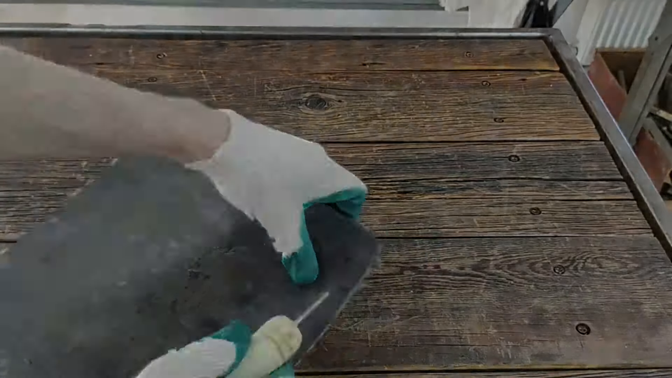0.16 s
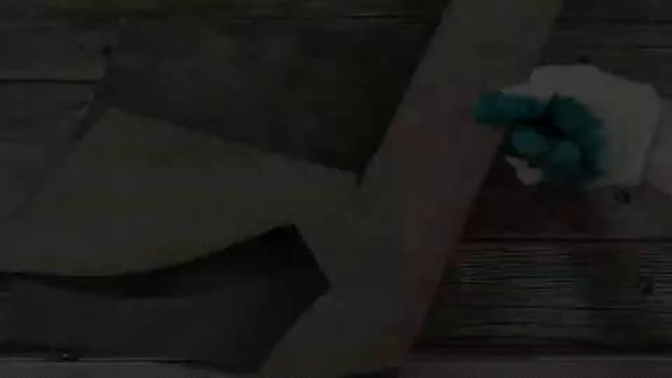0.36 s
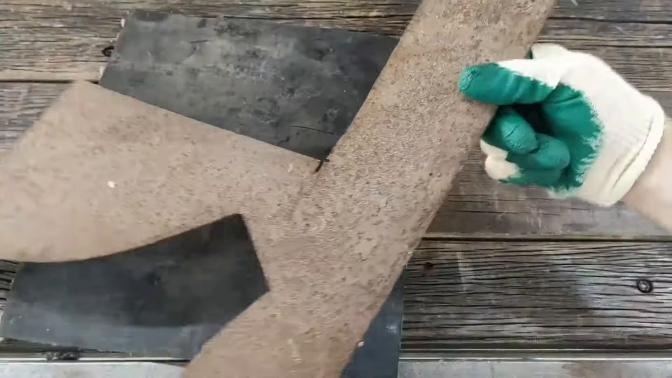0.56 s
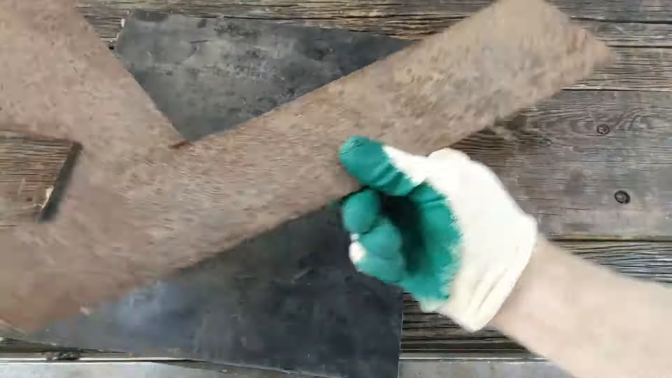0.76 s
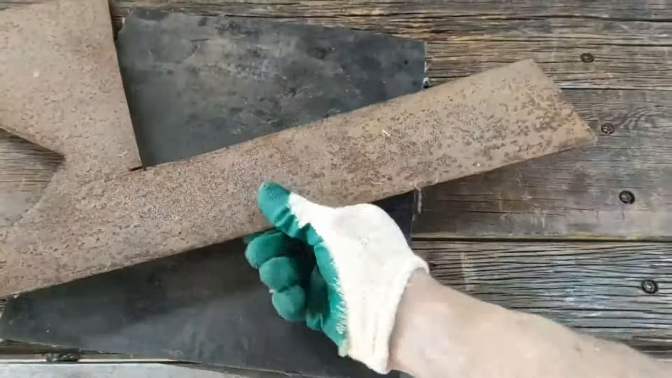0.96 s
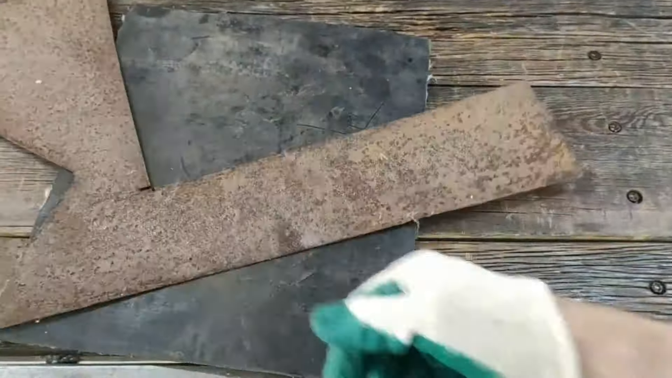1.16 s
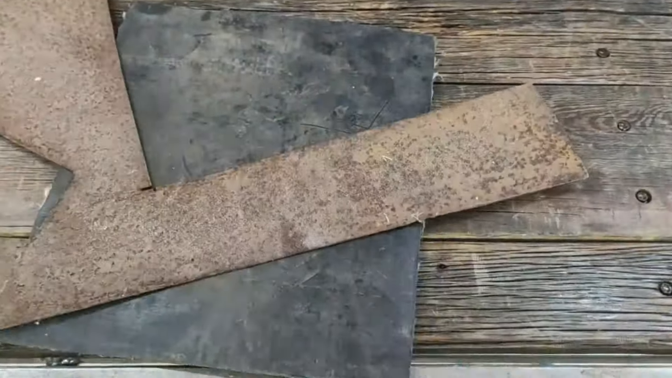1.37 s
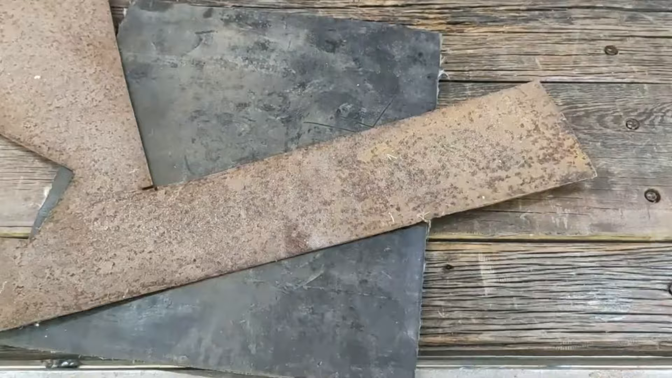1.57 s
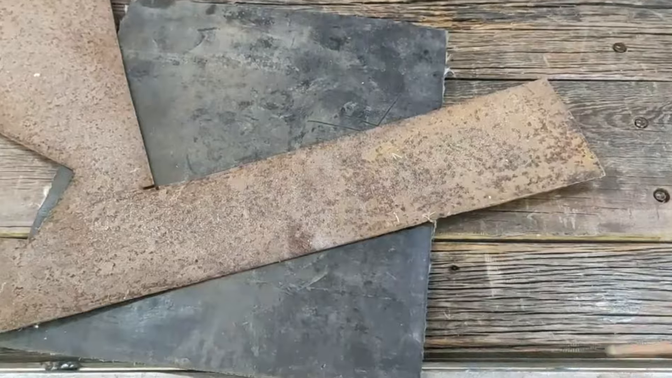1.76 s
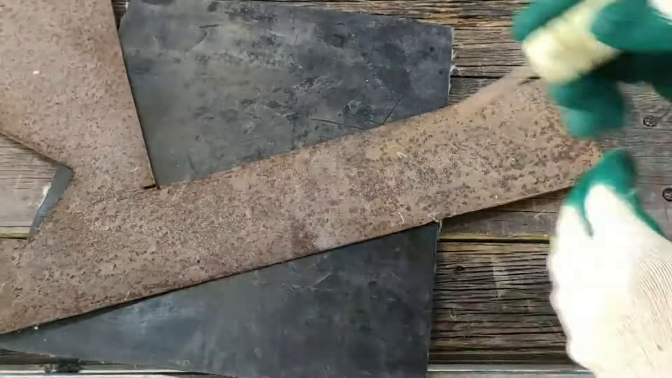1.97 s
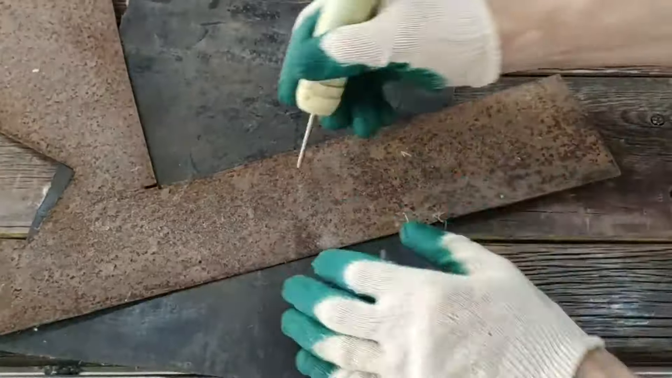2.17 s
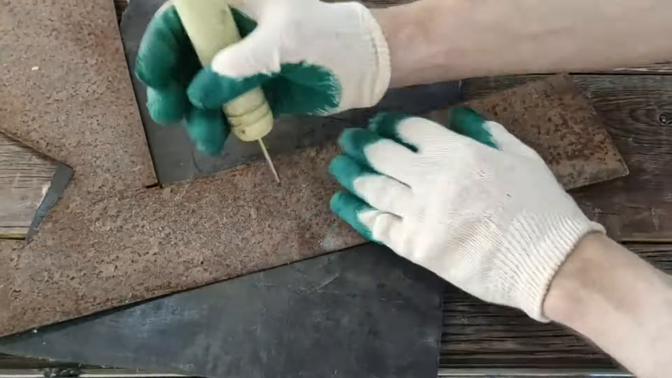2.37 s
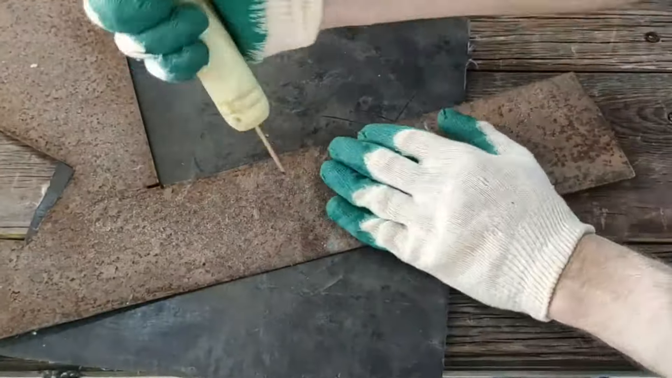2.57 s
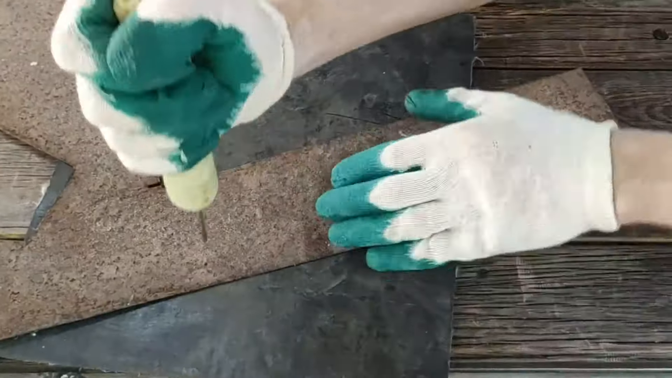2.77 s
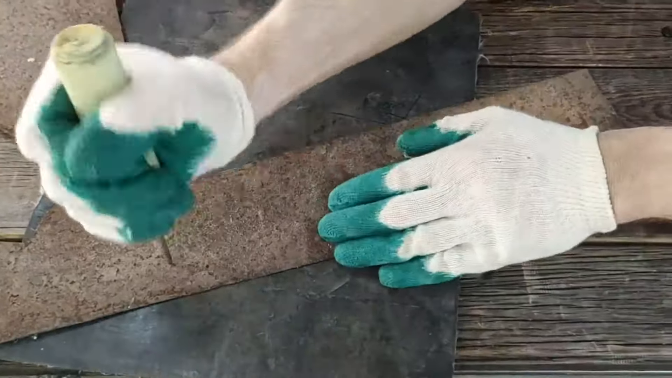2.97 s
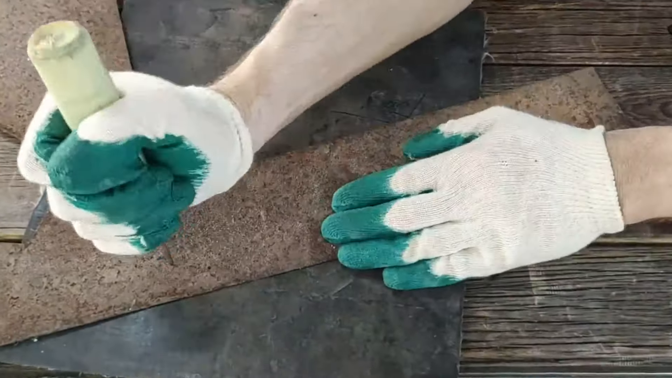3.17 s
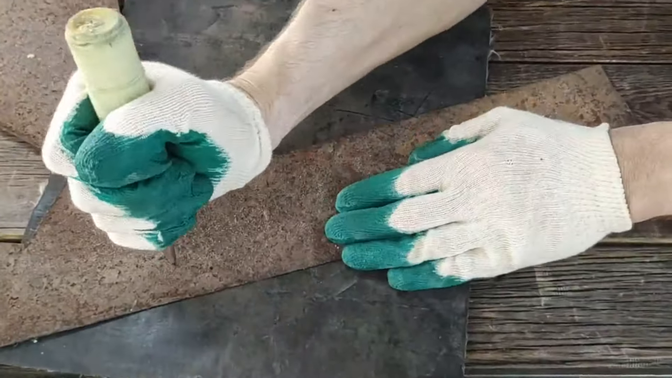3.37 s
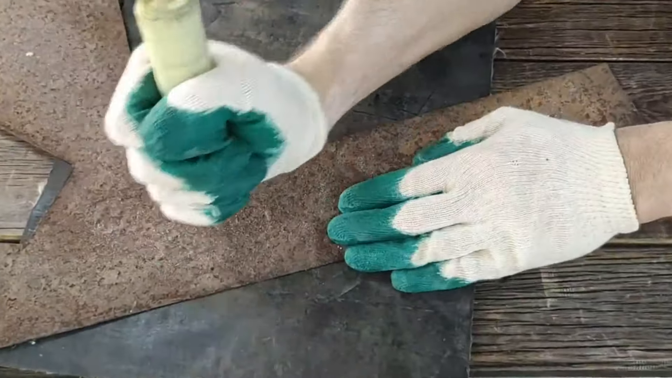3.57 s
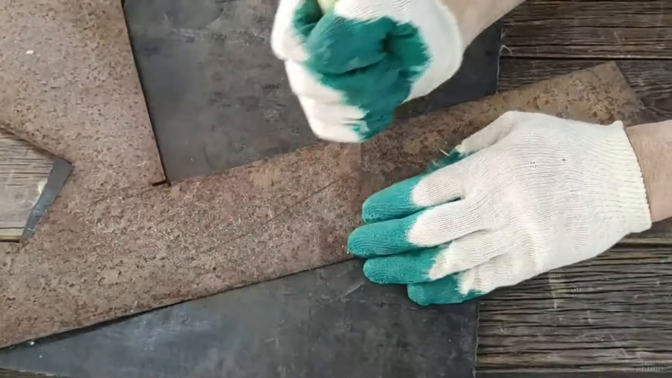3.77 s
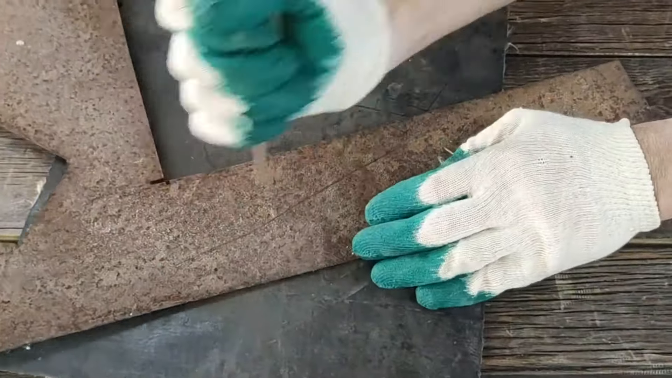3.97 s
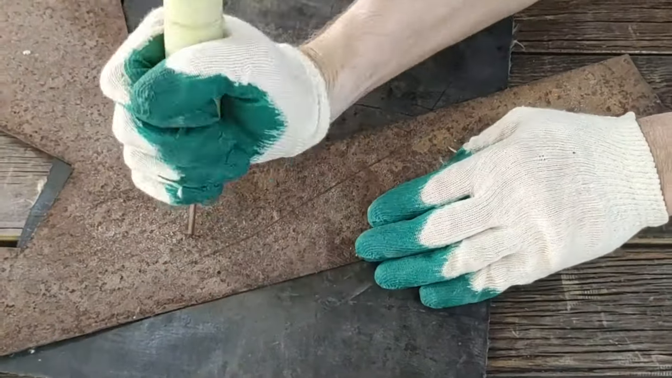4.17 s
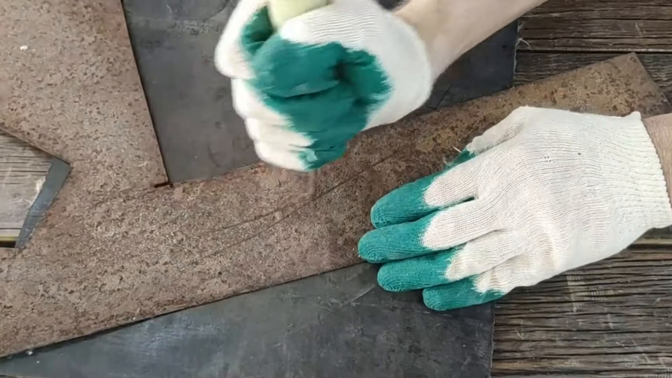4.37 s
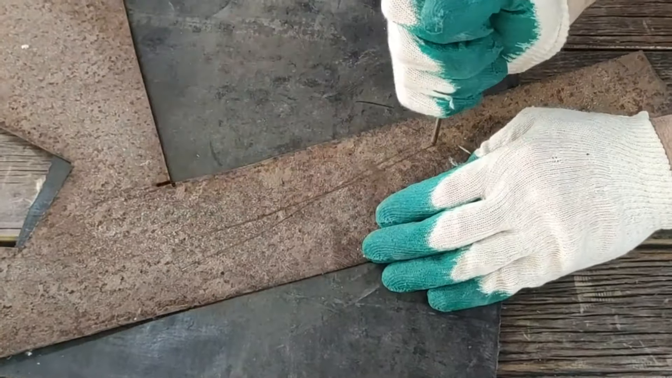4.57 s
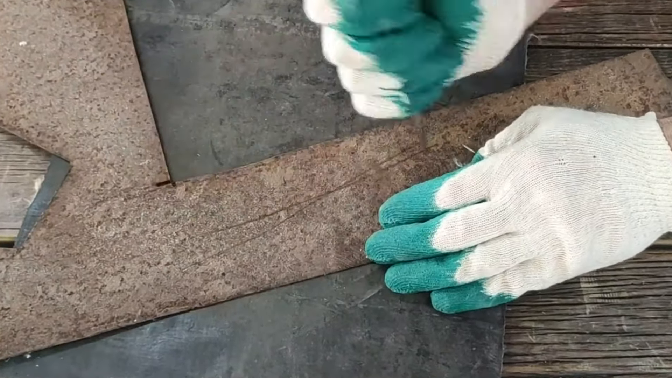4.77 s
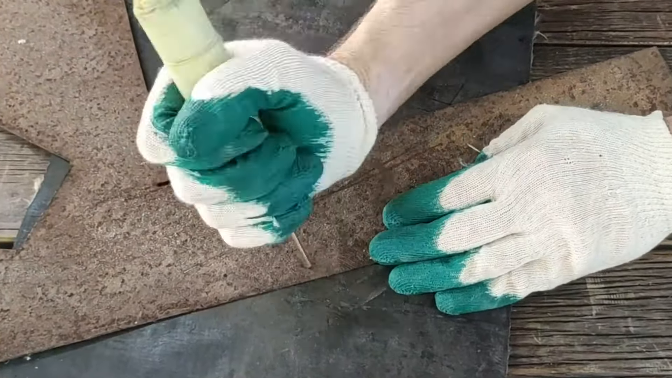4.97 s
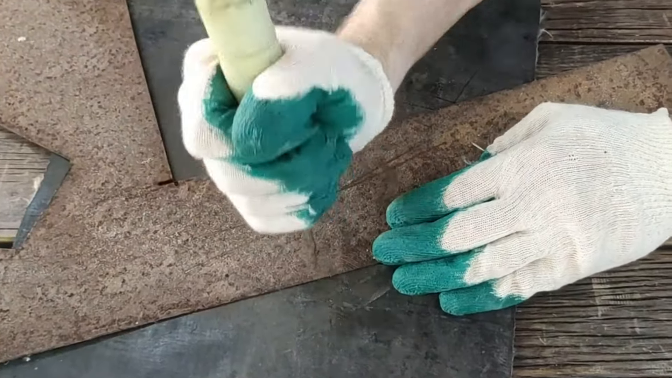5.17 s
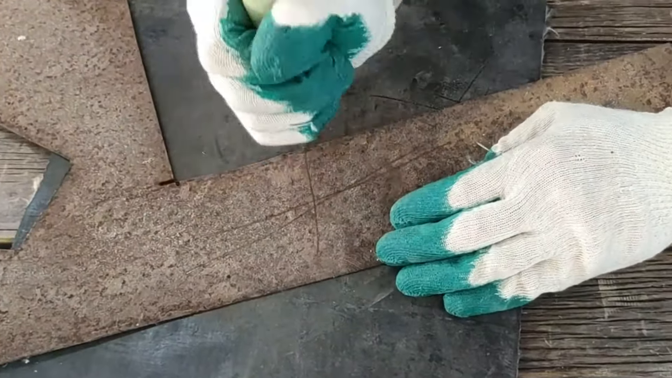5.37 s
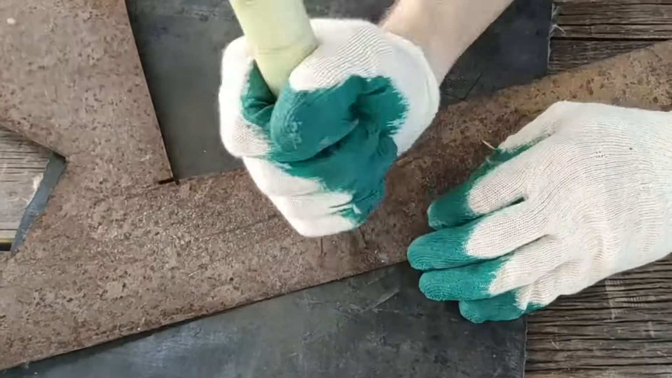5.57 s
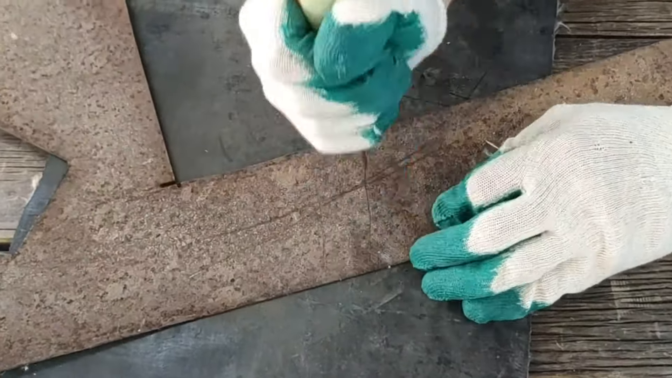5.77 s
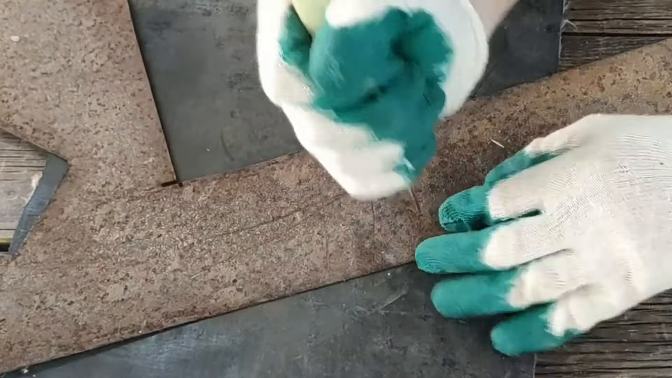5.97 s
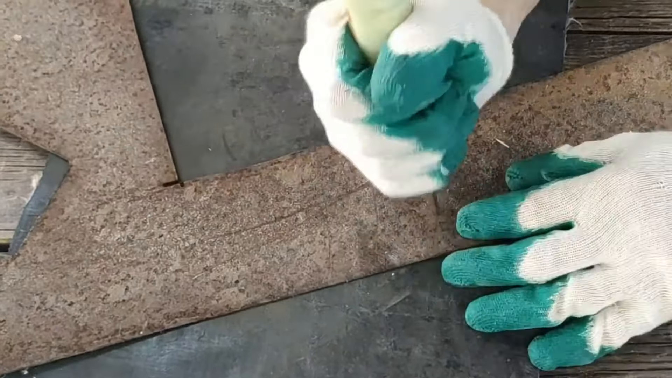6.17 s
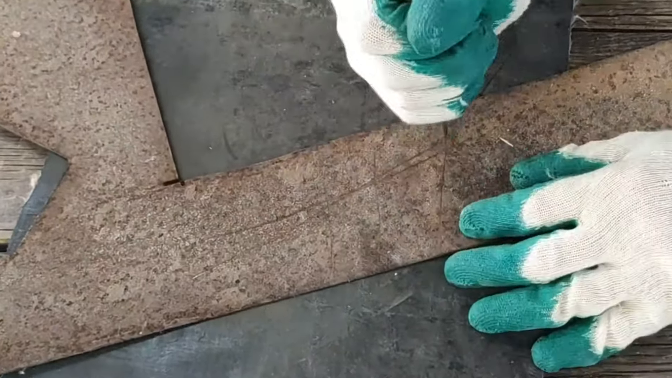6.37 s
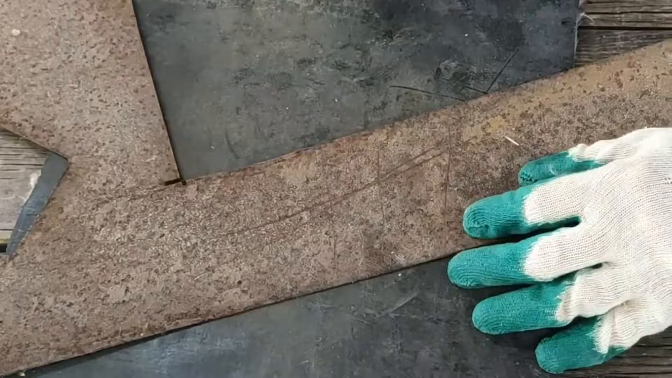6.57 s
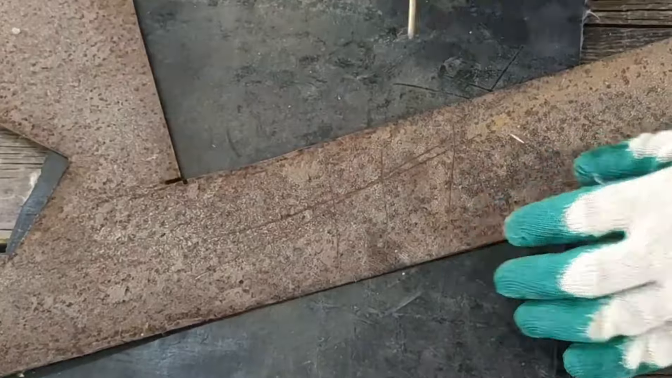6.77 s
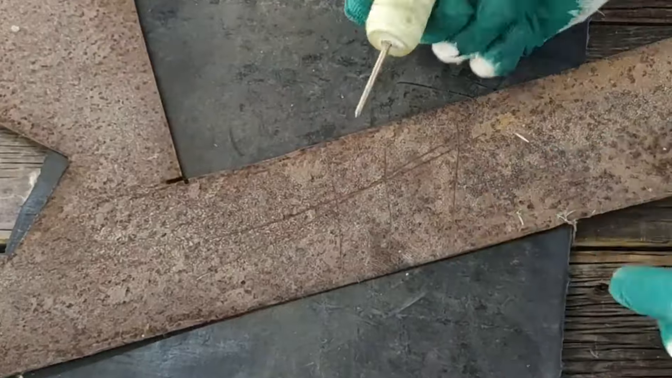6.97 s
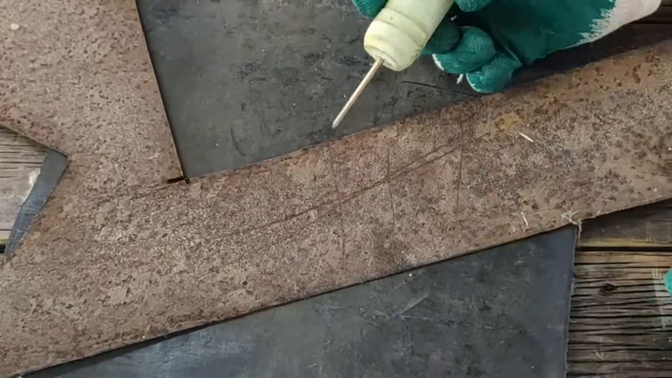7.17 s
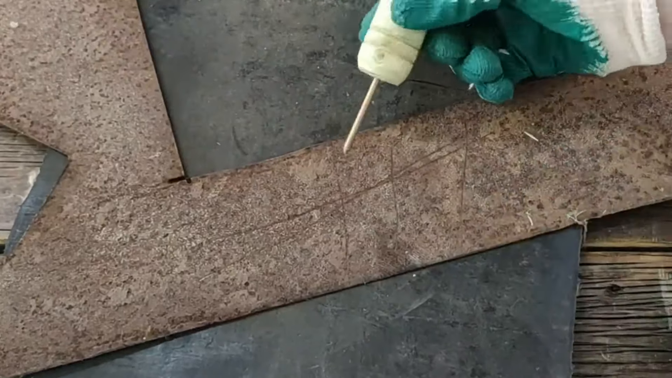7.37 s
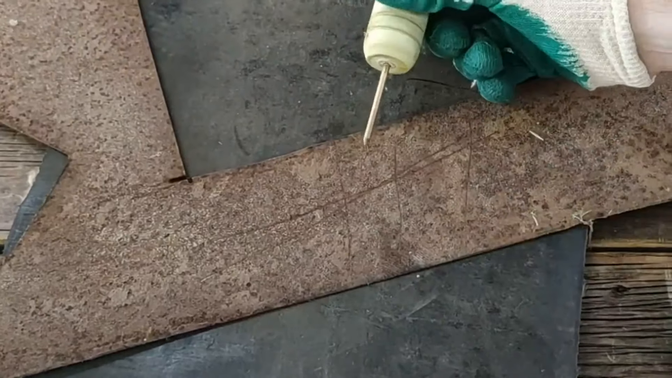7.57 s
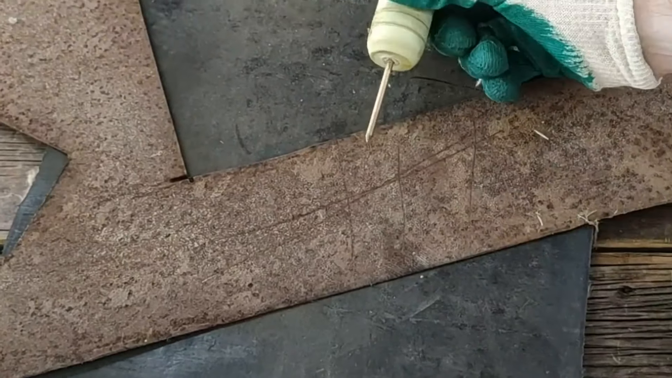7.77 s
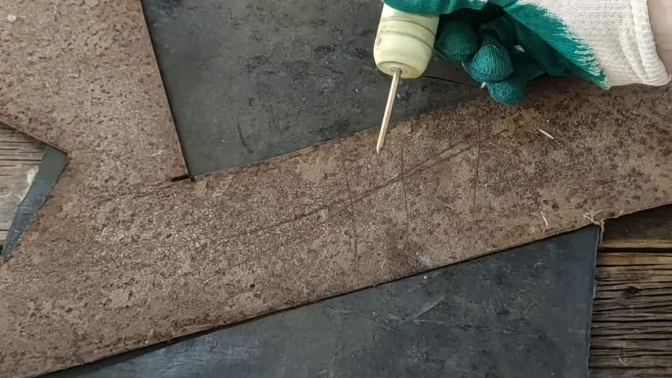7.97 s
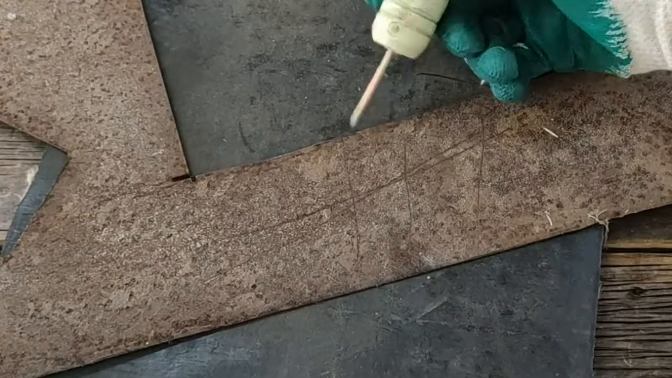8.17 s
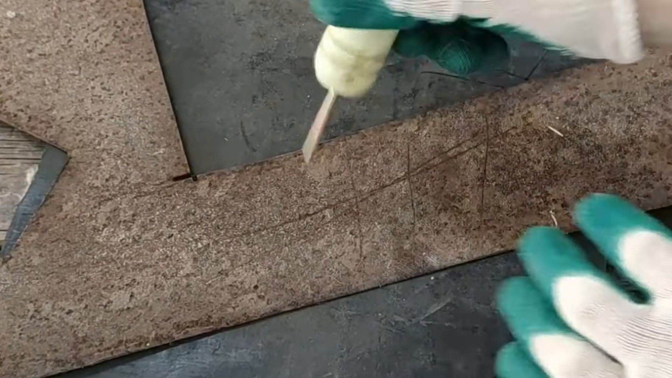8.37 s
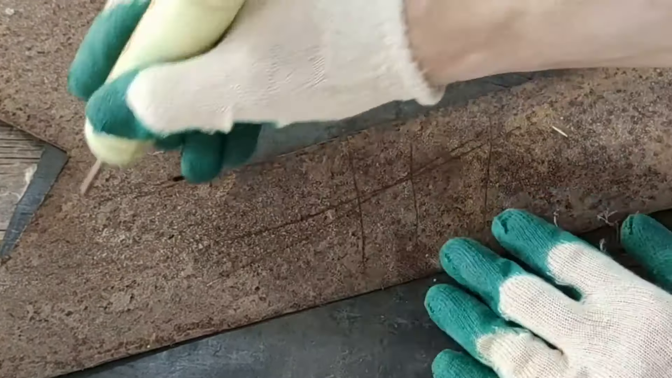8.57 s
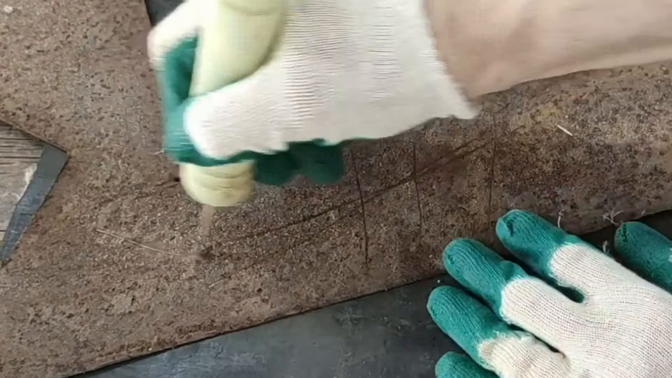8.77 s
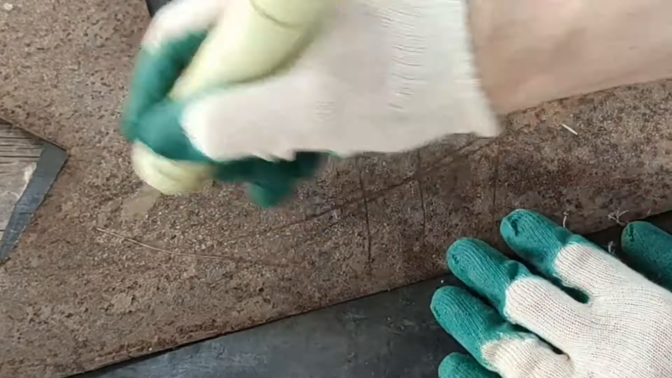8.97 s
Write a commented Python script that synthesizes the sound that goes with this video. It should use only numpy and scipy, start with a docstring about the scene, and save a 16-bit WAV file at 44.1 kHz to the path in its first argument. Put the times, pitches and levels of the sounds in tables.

```python
"""In a small workshop, a rusty steel offcut is laid on a steel plate on a wooden table; gloved hands slide over it.
A hard-tipped scriber is set down with a tick and dragged through the rust in short strokes.
Grit breaking under the tip drives the dense modes of the sheet; cloth and palm are swelling filtered noise.
Each contact is a burst of rattle with a ping; the room adds a short tail, over a low rumble and faint hiss."""
import sys
import numpy as np
from scipy import signal
from scipy.fft import rfft, irfft, next_fast_len
from scipy.io import wavfile

SR = 44100
rng = np.random.default_rng(int(sys.argv[2]) if len(sys.argv) > 2 else 0)


def materialize(psi):
    """Save the field psi as 16-bit PCM at rate SR to the path in sys.argv[1].

    A 1-D psi becomes a single channel; in a 2-D psi each row is a channel.
    """
    bounded = np.clip(np.atleast_2d(psi).T, -1, 1)
    quanta = np.round(bounded * 32767).astype(np.int16)
    wavfile.write(sys.argv[1], SR, quanta)


N = 397782

# colour of rust grains breaking and of contact rattle: pitch_hz [Hz], level_db [dB per Hz, relative]
GRIT_COLOUR = [(120, -41), (200, -11), (310, -12), (407, -6), (597, -8.5), (716, -3.5), (1030, -9),
               (1380, -2), (1630, -8.5), (2060, 0), (3140, -4), (6050, -3.5), (11200, 0), (13700, -6.5),
               (15600, -7.5)]
# modes of the offcut: pitch_hz [Hz], level_db [dB, relative], t60_s [s, ringing freely]
SHEET_MODES = [(484, -8, .25), (637, -7, .7), (760, -8, .25), (965, -9, .2), (1106, -4, .2),
               (1463, -8, .12), (1593, -10, 1.2), (1890, -9, .1), (2075, -8, .1), (2304, -16, .25),
               (2525, -9, .12), (3192, -12, .2), (3644, -6, .2), (3817, -10, .2), (4400, -6, .25)]


def amp(db):
    """Decibels to gain."""
    return 10 ** (np.asarray(db) / 20)


def rms_one(x):
    """Scale to unit rms."""
    return x / np.sqrt(np.mean(x ** 2) + 1e-20)


def at_hz(points, hz):
    """Read a table on a log-frequency axis."""
    pitch_hz, values = np.array(points)[:, 0], np.array(points)[:, 1]
    return np.interp(np.log(hz + 1), np.log(pitch_hz), values)


def colour(x, spectrum):
    """Shape white input by a spectrum, keeping its power."""
    size = next_fast_len(x.shape[-1])
    gain = amp(at_hz(spectrum, np.arange(size // 2 + 1) * SR / size))
    return irfft(rfft(x, size) * rms_one(gain), size)[..., :x.shape[-1]]


def pair(size):
    """Left and right noise, alike in the bass and unlike in the treble."""
    # stereo likeness: pitch_hz [Hz], left-right correlation [-1 to 1]
    likeness = [(30, .93), (60, 0.57), (150, 1), (380, 0.85), (950, 0.5), (2380, -0.28), (5980, -0.2),
                (15000, 0.21)]
    mid, side = rfft(rng.standard_normal((2, size)))
    alike = np.clip(at_hz(likeness, np.arange(size // 2 + 1) * SR / size), -.95, .95)
    spectra = np.sqrt(1 + alike) * mid + np.sqrt(1 - alike) * side * [[1], [-1]]
    return irfft(spectra, size) / np.sqrt(2)


def coloured_pair(spectrum):
    """Stereo noise of one colour for the whole scene."""
    return colour(pair(next_fast_len(N))[:, :N], spectrum)


def drift(rate_hz):
    """Slow random wander of unit rms: noise through two equal one-pole lowpasses."""
    r = np.exp(-2 * np.pi * rate_hz / SR)
    wander = signal.lfilter([1], [1, -2 * r, r * r], rng.standard_normal(N + SR))
    return rms_one(wander[SR:])     # the filter settles during the first second


def resonance(x, hz, width_hz):
    """One resonance with gain 1 on top."""
    r, w = np.exp(-np.pi * width_hz / SR), 2 * np.pi * hz / SR
    return signal.lfilter((1 - r * r) / 2 * np.array([1, 0, -1]), [1, -2 * r * np.cos(w), r * r], x)


def bands(x, gains):
    """Give body, middle, bite and edge of a contact sound their own envelopes; each band has unit power."""
    size = next_fast_len(N)
    hz, spectrum = np.arange(size // 2 + 1) * SR / size, rfft(x, size)
    below = [1 / (1 + (hz / split_hz) ** 6) for split_hz in (1200, 3000, 6000)]
    below = [hz * 0] + below + [hz * 0 + 1]
    out = 0
    for gain, lower, upper in zip(gains, below, below[1:]):
        out = out + gain * rms_one(irfft(spectrum * (upper - lower), size)[:, :N])
    return out


def swells(rows):
    """Gain of sounds that rise to a rounded peak and fall, straight in dB."""
    rounding = 0.074    # share of the rise and fall over which the peak is rounded
    t, gain = np.arange(N) / SR, 0
    for peak_s, db, rise_s, fall_s in rows:
        away = np.maximum((peak_s - t) / max(rise_s, .003), (t - peak_s) / max(fall_s, .003))
        gain = gain + amp(db - 20 * (np.hypot(away, rounding) - rounding))
    return gain


def effort():
    """Gains of four bands: each stroke's level moves from start through a turning level, louder or softer, to its end."""
    # strokes and slides of steel on steel: start_s, turn_s, end_s [s],
    # start_db, turn_db, end_db [dB, middle band 1.2-3 kHz],
    # body_db (below 1.2 kHz), bite_db (3-6 kHz), edge_db (above 6 kHz) [dB re middle]
    strokes = [(1.018, 1.044, 1.14, -45, -54, -58, 6.5, -5, 1.5),
               (1.16, 1.198, 1.25, -46, -41, -51.5, -3, -8, -17),
               (1.241, 1.262, 1.368, -37, -45.5, -67, -4.5, 1, -2.5),
               (3.605, 3.61, 3.67, -48.5, -45.5, -52, -4.5, -0.5, 12),
               (3.648, 3.703, 3.764, -40.5, -40, -46.5, -5.5, 1.5, 8),
               (3.769, 3.887, 3.962, -46, -41, -45.5, -3, 3.5, 9),
               (4.354, 4.418, 4.641, -47.5, -38, -40, -4, -1, 8.5),
               (5.266, 5.38, 5.42, -47, -41, -44.5, -1, -6.5, 6.5),
               (5.757, 5.866, 5.94, -51, -38, -41, -7, -7.5, 1),
               (6.237, 6.353, 6.48, -48, -37.5, -51, -6.5, -9.5, 0.5),
               (6.489, 6.54, 6.527, -47, -45.5, -46.5, -2.5, 0.5, 3.5),
               (8.827, 8.835, 8.866, -66, -50.5, -65.5, -5.5, 14.5, 22),
               (8.875, 8.935, 8.956, -49, -44, -43.5, -2.5, 8, 16)]
    t, gains = np.arange(N) / SR, np.zeros((4, N))
    for start, turn, end, start_db, turn_db, end_db, body_db, bite_db, edge_db in strokes:
        gate = np.interp(t, [start - .003, start, end, end + .008], [0, 1, 1, 0])
        level_db = np.interp(t, [start, turn, end], [start_db, turn_db, end_db])
        gains += gate * amp(level_db) * amp([[body_db], [0], [bite_db], [edge_db]])
    return gains


def rumble():
    """Lumpy lows carried by table and building, over the faint hiss of the microphones."""
    # colour of the lows, then of the hiss: pitch_hz [Hz], level_db [dB per Hz, relative]
    low_colour = [(13, -45), (22, 4.5), (76, -2), (250, -21.5), (320, -48), (550, -120)]
    hiss_colour = [(88, -37), (150, 2), (699, -24), (1010, -17), (2080, -18), (6450, -25.5), (12000, -16),
                   (15800, -19.5)]
    # the table is jolted: peak_s [s], level_db [dB]
    jolts = [(.02, -62), (.17, -64), (.37, -61.5), (1.03, -58), (1.2, -47), (2.1, -74), (2.63, -69),
             (3.01, -52.5), (3.63, -59), (4.23, -47), (5.09, -52), (5.69, -48.5), (6.17, -46.5), (8.4, -67),
             (8.64, -60.5), (8.77, -56.5)]
    rest_db, drag_db, hiss_db = -74, -18.5, -81     # drag_db is relative to the stroke
    rise_s, fall_s = 0.067, 0.18                    # per 20 dB
    level = amp(rest_db) + amp(drag_db) * effort()[1]
    level = level + swells([(s, db, rise_s, fall_s) for s, db in jolts])
    low = rms_one(coloured_pair(low_colour)) * level * amp(0.59 * drift(34))
    hiss = rms_one(colour(rng.standard_normal((2, N)), hiss_colour))
    return low + amp(hiss_db) * hiss


def gloves():
    """Knitted cloth brushing rust gives a smooth hiss; a palm on the table a duller rub."""
    # colours of cloth and palm: pitch_hz [Hz], level_db [dB per Hz, relative]
    cloth_colour = [(880, -38.5), (1500, -8.5), (2670, -1.5), (2920, 0.5), (3220, 0), (4040, 0.5),
                    (5470, -1), (14700, 2), (15600, -11.5)]
    palm_colour = [(71, -62.5), (120, -13), (181, -1.5), (250, 0.5), (621, 2), (1200, -3), (4000, -15),
                   (5200, -57.5), (8800, -120)]
    # cloth brushing rust: peak_s [s], level_db [dB], rise_s, fall_s [s per 20 dB]
    brushes = [(.01, -66, .1, .6), (0.125, -54, .06, .28), (.4, -66, .5, .14), (.56, -69, .12, .12),
               (.62, -73, .04, .2), (.93, -77, .3, .15), (1.5, -68, .1, .5), (1.695, -65, .03, .07),
               (1.83, -55, .13, .14), (1.935, -63, .1, .07), (2.11, -64, .1, .15), (2.235, -61, .13, .18),
               (2.41, -46, .09, .2), (2.62, -47, .15, .26), (2.8, -50, .09, .3), (2.95, -61, .3, .1),
               (3.09, -43, .25, .19), (4.28, -49, .05, .08), (6.62, -56, .05, .25), (6.876, -64, .1, .15),
               (7.12, -69, .5, .2), (7.2, -61, .02, .42), (8.21, -61, .012, .35), (8.47, -62, .17, .11),
               (8.585, -62, .05, .1), (8.64, -64, .1, .1)]
    # a palm rubbing the table: peak_s [s], level_db [dB], fall_s [s per 20 dB]
    palm_rubs = [(0.0, -67.5, 0.48), (0.289, -66.5, 0.38), (1.45, -73, 0.5), (1.78, -79.5, 0),
                 (1.95, -79, 0), (2.04, -72, 0.3), (2.104, -64.5, .25), (2.38, -56.5, 0.33),
                 (2.655, -64.5, .4), (2.99, -53, 0.3), (4.13, -63, 0.33), (4.22, -54, .12),
                 (6.875, -72, 0.27), (7.188, -57, 0.16), (7.452, -76.5, 0.46), (8.205, -62, 0.22),
                 (8.4, -79.5, .5), (8.588, -72, .3)]
    palm_rise_s = 0.007     # per 20 dB
    hiss = rms_one(coloured_pair(cloth_colour)) * swells(brushes) * amp(1.0 * drift(27))
    rub = rms_one(coloured_pair(palm_colour)) * amp(2.3 * drift(21))
    return hiss + rub * swells([(s, db, palm_rise_s, fall) for s, db, fall in palm_rubs])


def ticks():
    """Each contact rattles and pings; it rings the table and the nearest sheet modes, shorter under the palm."""
    # contacts: start_s [s], level_db [dB], edge_db, ping_db [dB re level], ping_hz [Hz]
    knocks = [(0.2854, -54.5, -17, 5, 306), (0.372, -63, -20, 9, 190), (2.0966, -54, -3, -2, 604),
              (2.3722, -44, 5, 3, 716), (4.137, -55, -10, 4.5, 310), (4.2793, -39, 9.5, -11, 716),
              (7.1464, -58.5, -7, -8, 610), (7.4517, -65, -7, -8, 504), (8.2001, -53, -6, 4, 644),
              (8.5829, -57, 10, -15.5, 475)]     # padded fingers
    clanks = [(1.0157, -29.5, 4, -0.5, 1140), (1.1619, -38.5, -11, -17, 2480),
              (1.1828, -31.5, -24, -9, 740), (1.1932, -27, -16.5, 0, 467), (1.2397, -27, -2.5, -6, 1940),
              (1.2607, -28, -5, -10, 1700)]     # the offcut settling on the plate
    taps = [(1.598, -48.5, 1, -17, 1580, .003), (1.6549, -63, 12, -8, 1570, .002),
            (1.9117, -55, 5, -12, 4740, .001), (1.9515, -52, 9.5, -5, 3400, .001),
            (2.3999, -26.5, 11, -2, 2700, .004), (2.9792, -17.5, -6, -13, 2075, .0015),
            (3.304, -30, -1.5, 3.5, 3560, .0004), (3.6036, -29.5, 4.5, -4, 1640, .003),
            (4.2015, -15, -5, -2, 4450, .0005), (4.849, -36, -4, -5.5, 4870, .001),
            (4.866, -37, 0, -9, 3400, .003), (5.07, -24.5, -3.5, -11.5, 2600, .0005),
            (5.2656, -35.5, 4.5, 4.5, 1280, .004), (5.5056, -32, 6.5, -3.5, 642, .002),
            (5.6764, -16.5, 10.5, -2, 2280, .0025), (6.0044, -33, 6, -11, 790, .002),
            (6.151, -11.5, 8.5, -4, 2040, .0025), (7.1814, -30.5, -25.5, -16.5, 935, .0008),
            (8.7268, -18.5, 6, -3, 2510, .0025)]         # a hard point meets or leaves the steel; one more column: attack_s [s]
    snags = [(3.6171, -24, 17.5, -14, 2240), (3.6463, -27, 17.5, -16.5, 2940), (3.939, -21, 11, -3, 3430),
             (3.9641, -22, 15, -7, 5600), (4.3527, -43, 1.5, -10, 5450), (4.5456, -20, 11.5, -4, 1990),
             (4.5749, -20, -15, -4.5, 1020), (4.642, -28, 6, -9, 2000), (4.673, -21.5, 12, -5, 975),
             (5.9259, -30, 10.5, -4, 754), (6.2364, -29.5, 16.5, -0.5, 1220), (6.4357, -30, 5, 1, 1500),
             (6.4681, -32, 18, -19, 2200), (6.49, -23.5, 8.5, -6, 1400), (6.5309, -23, 9.5, -7, 1950),
             (8.869, -24.5, 22, 9, 5250), (8.9294, -27, 10, 3, 3740), (8.958, -22, 13.5, -5, 5380),
             (8.9741, -21.5, 15, 2, 5480)]       # the moving tip catches on a ridge of rust
    # shared by a kind: attack_s [s, 0.0002 at least; taps have their own], body_db [dB re level],
    # rattle_t60_s [s, before each band's stretch], ring_db [dB re ping, ringing of the sheet]
    knock_kind = (-1.5, -2.5, 0.09, -27.5)
    clank_kind = (0.2, -6, .022, -2.5)
    tap_kind = (-16.5, .034, -13.5)
    snag_kind = (0.1, -15.5, 0.0309, -17.5)
    # table top and plate: pitch_hz [Hz], level_db [dB, relative], t60_s [s]
    table_modes = [(37.3, -1.5, 0.091), (99.4, -14, 1), (177, -6.5, 0.21), (218, 3, 0.2), (268.6, -2, 0.21),
                   (404, -13.5, .15)]
    hand_on_s, hand_damping_db_per_s = 2.3, 40  # a palm holds the sheet from here on; extra decay at 1 kHz
    ping_width = .06                            # share of its centre
    nearness_db_per_octave = 16.5               # modes far from the ping are struck less
    bite_follows_edge = .3                      # share of edge_db that reaches down to 3-6 kHz

    kinds = ((clanks, clank_kind), (taps, tap_kind), (snags, snag_kind), (knocks, knock_kind))
    contacts = [(*row, *kind) for rows, kind in kinds for row in rows]
    size, rattle_size = 24576, 8192
    t = np.arange(size) / SR
    short_t = t[:rattle_size]
    hz, mode_db, mode_t60 = np.array(SHEET_MODES).T[:, :, None]
    free = amp(-60 * t / mode_t60) * np.sin(2 * np.pi * hz * t) * (1 - np.exp(-t / .001))
    # the palm damps higher modes faster, levelling off from 2 kHz
    held = free * amp(-hand_damping_db_per_s * np.minimum(hz / 1000, 2) ** 2 * t)
    thud = sum(amp(db - 60 * t / t60) * np.sin(2 * np.pi * f * t) for f, db, t60 in table_modes)
    thud = thud * (1 - np.exp(-t / 0.0024))
    stretch = np.array([2.2, 0.98, 1.6, 0.9])[:, None, None]    # the body lasts longer than the edge

    envelope, rings = np.zeros((4, 2, N + size)), np.zeros((2, N + size))
    for start_s, level_db, edge_db, ping_db, ping_hz, attack, body_db, t60, ring_db in contacts:
        i, gain, t60 = int(start_s * SR), amp(level_db), max(t60, .005)
        shape = (1 - np.exp(-short_t / max(attack, .0002))) * amp(-60 * short_t / (t60 * stretch))
        shape = shape * (1 + 1.04 * np.exp(-short_t / 0.0026))  # the first touch cracks
        band_db = np.array([body_db, -4, bite_follows_edge * edge_db - 4.5, edge_db]) - 6.5
        envelope[..., i:i + rattle_size] += amp(band_db)[:, None, None] * gain * shape

        burst = rng.standard_normal(size) * (1 - np.exp(-t / .001)) * amp(-60 * t / (2.5 * t60))
        ping = resonance(burst, ping_hz, ping_width * ping_hz) * np.sqrt(SR / ping_hz) * amp(ping_db - 3)
        luck_db = 2.5 * rng.normal(0, 1, hz.shape)
        distance_db = nearness_db_per_octave * abs(np.log2(hz / ping_hz))
        strength_db = ping_db + ring_db + mode_db + luck_db - distance_db
        modes = amp(strength_db[:, 0]) @ (held if start_s > hand_on_s else free)
        rings[:, i:i + size] += gain * (ping + modes) + amp(level_db + body_db + ring_db - 7) * thud
    rattle = bands(coloured_pair(GRIT_COLOUR), envelope[..., :N])
    return rings[:, :N] + rattle


def grit(per_s, spread_db, clump_db):
    """Rust grains break at random, uneven and in clumps; the sheet smears each into a short noisy ring."""
    smear_t60_s = 0.017
    sizes = amp(spread_db * np.minimum(rng.exponential(1, N), 5)) * rng.choice([-1, 1], N)
    clumps = amp(clump_db * (0.16 * drift(50) + .9 * drift(140)))
    grains = sizes * (rng.random(N) < per_s / SR) * clumps
    # the tip reaches a new spot about every 20 ms, blending in; each of eight spots radiates in its own way
    step = (np.arange(N) + rng.integers(0, 900, N)) // 900
    spot = rng.integers(0, 8, N // 900 + 2)[step]
    t, out = np.arange(2048) / SR, 0
    for k in range(8):
        smear = pair(2048) * amp(-60 * t / smear_t60_s)
        out = out + signal.oaconvolve((grains * (spot == k))[None], smear, axes=1)[:, :N]
    return colour(out, GRIT_COLOUR)


def scriber():
    """The tip ploughing through rust; the scrape keeps the modes of the sheet sounding."""
    scrape_db = 2.5                     # added to every stroke
    ring_db, ring_share = 15, 0.65      # for a mode 1 Hz wide; share of its free t60
    grains = grit(per_s=3500., spread_db=2.5, clump_db=2.0)
    scrape = bands(grains, effort() * amp(scrape_db))
    drive = scrape.mean(0) + 1e-18
    modes = 0
    for hz, db, t60 in SHEET_MODES:
        width_hz = np.log(1000) / np.pi / (t60 * ring_share)
        modes = modes + amp(db + 1.7 * drift(6.5)) / np.sqrt(width_hz) * resonance(drive, hz, width_hz)
    return scrape + amp(ring_db) * modes


def workshop(x):
    """Diffuse tail: octave bands of noise, each dying at its own rate after a short build-up."""
    # decay of the room: pitch_hz [Hz], t60_s [s]
    room_decay = [(100, 1), (260, 0.65), (700, 0.55), (1840, 0.46), (4850, 0.43), (12800, 0.4)]
    size = 32768
    t, tail = np.arange(size) / SR, 0
    for low_hz in 40 * 2. ** np.arange(9):
        octave = signal.butter(2, [low_hz, 2 * low_hz], "band", fs=SR, output="sos")
        noise = signal.sosfilt(octave, pair(size))
        tail = tail + noise * amp(-60 * t / at_hz(room_decay, low_hz * np.sqrt(2)))
    tail = tail * (1 - np.exp(-t / 0.0018))
    return signal.fftconvolve(x, rms_one(tail) / np.sqrt(size), axes=1)[:, :N]


def scene():
    """Contacts on the sheet ring in the room; hands and rumble lie around them."""
    room_db = -8.5
    steel = scriber() + ticks()
    return steel + amp(room_db) * workshop(steel) + gloves() + rumble()


def record(dry):
    """The right microphone is a little more sensitive; the top is cut steeply."""
    cutoff_hz = 15750
    lowpass = signal.ellip(10, .5, 70, cutoff_hz, fs=SR, output="sos")
    return signal.sosfilt(lowpass, dry * amp([[-1], [1]]))     # left, right gain in dB


dry = scene()
out = record(dry)
materialize(out)
```